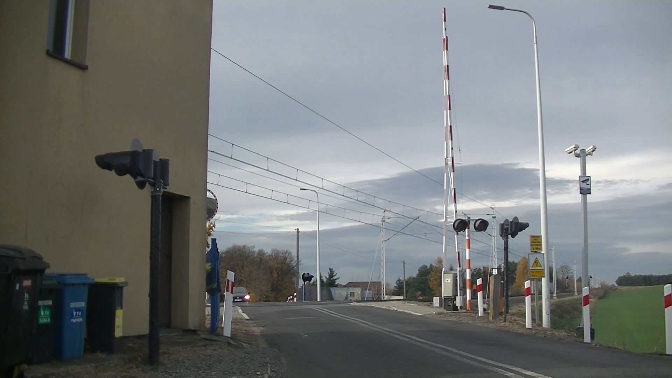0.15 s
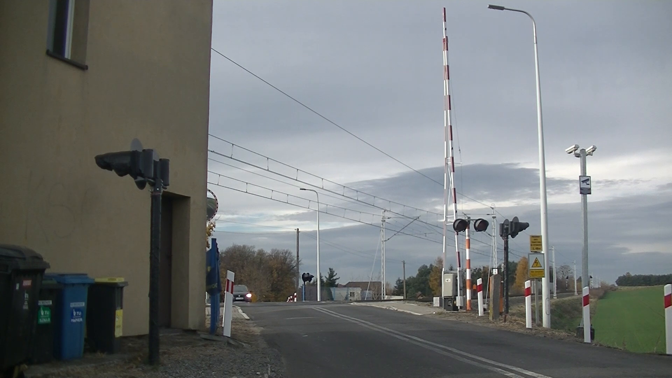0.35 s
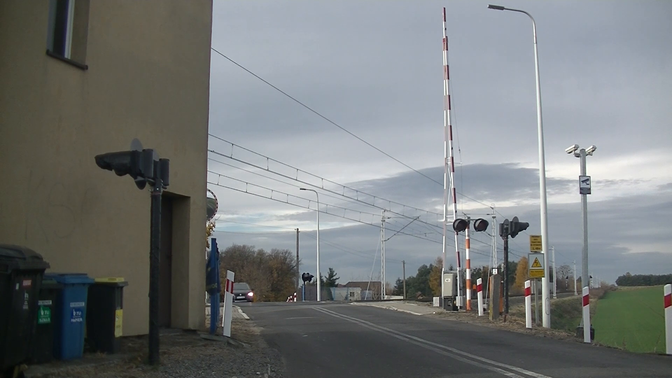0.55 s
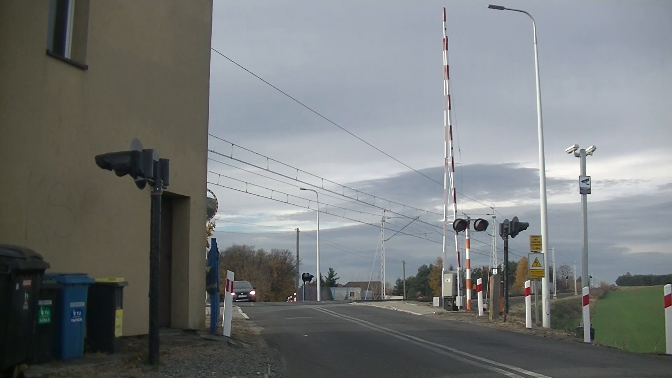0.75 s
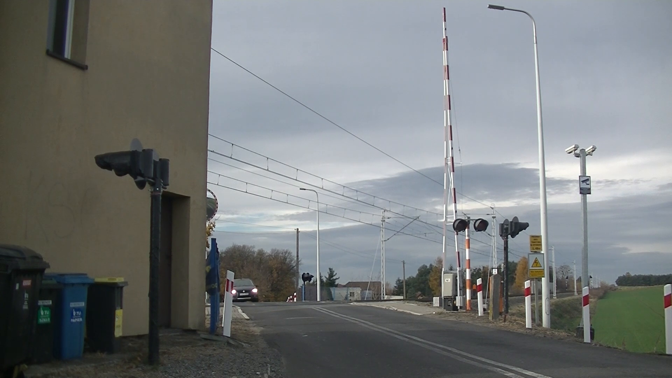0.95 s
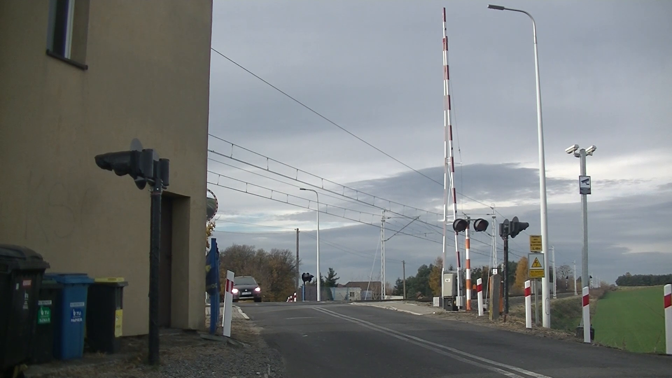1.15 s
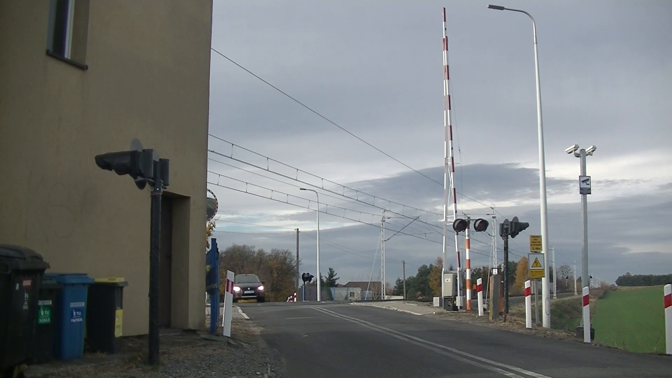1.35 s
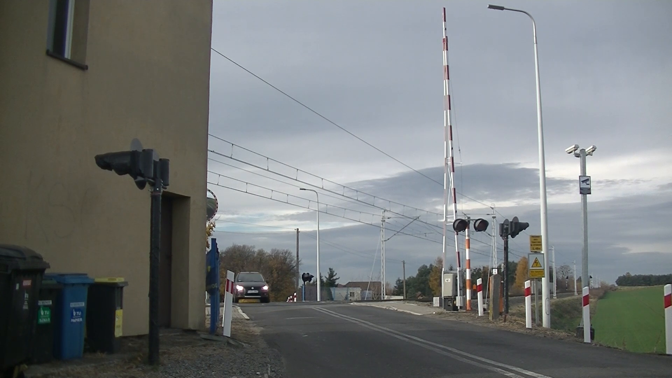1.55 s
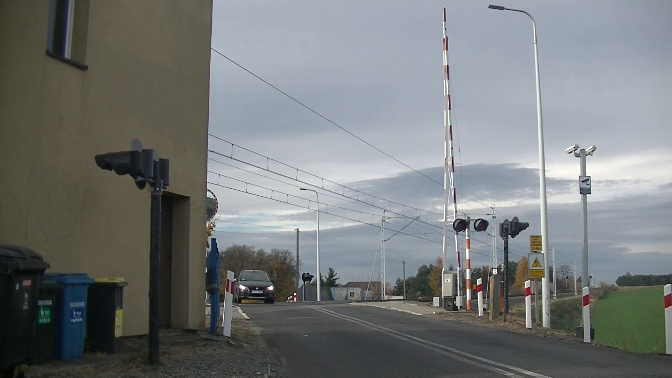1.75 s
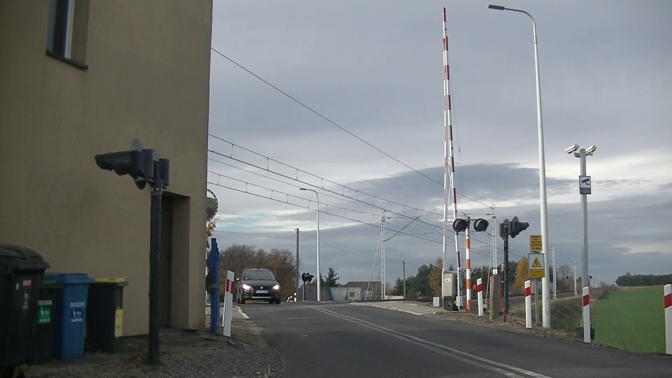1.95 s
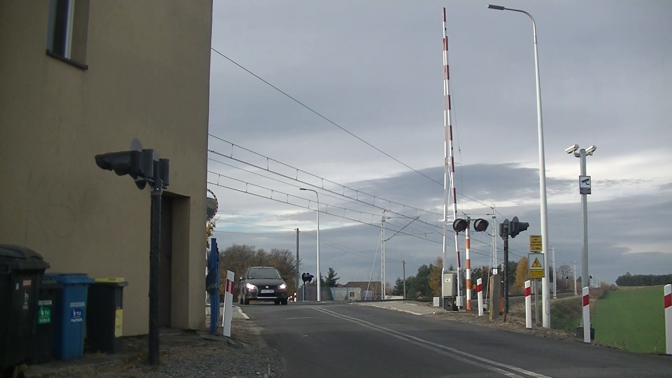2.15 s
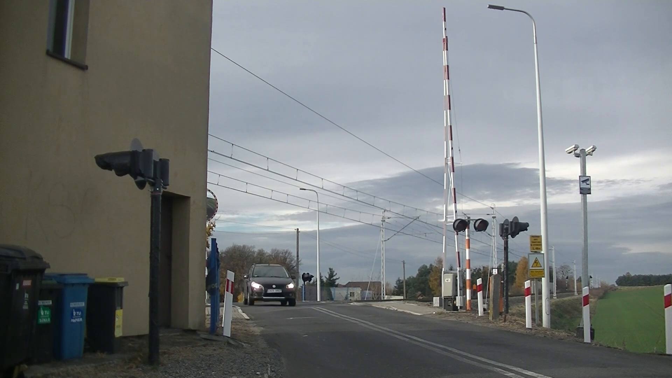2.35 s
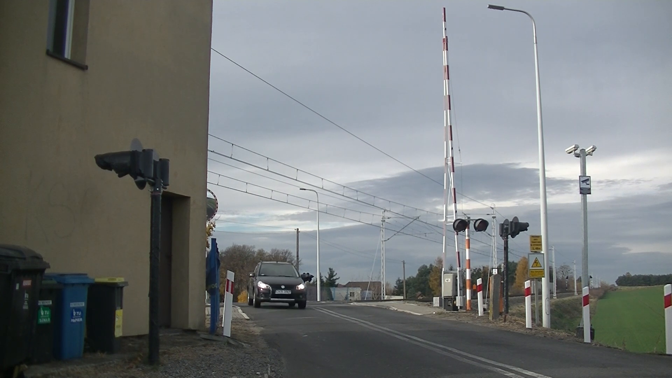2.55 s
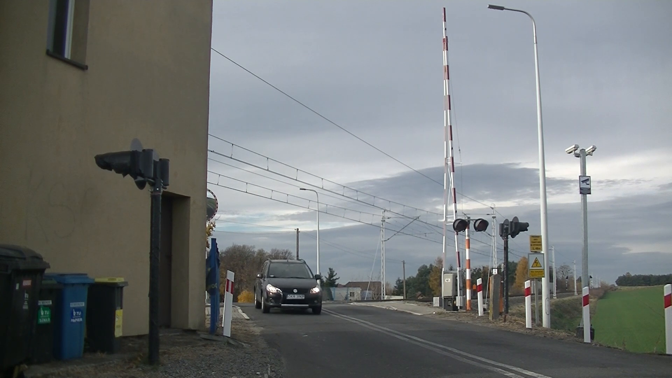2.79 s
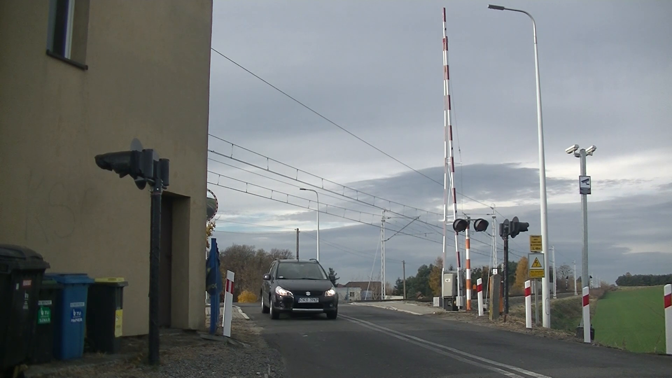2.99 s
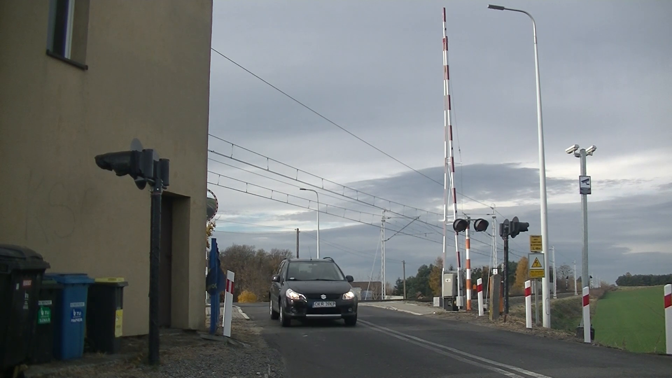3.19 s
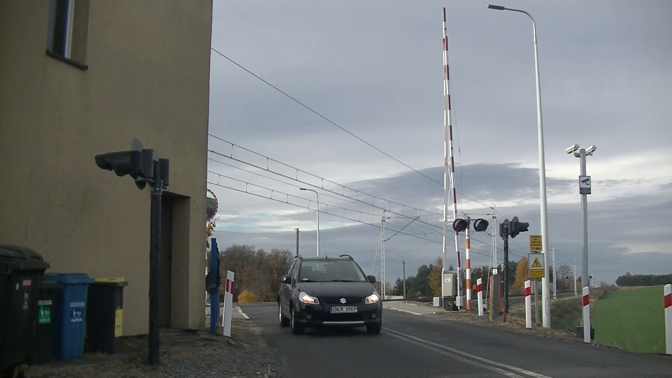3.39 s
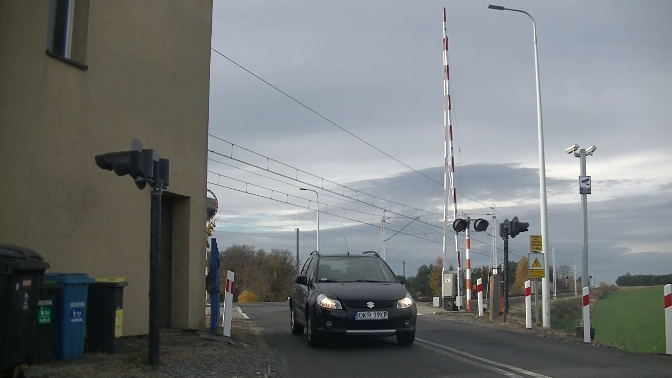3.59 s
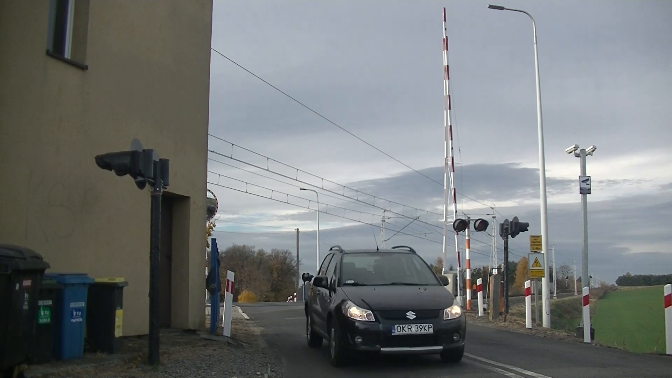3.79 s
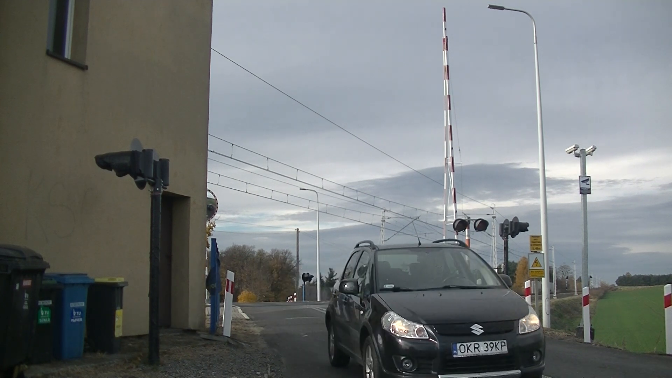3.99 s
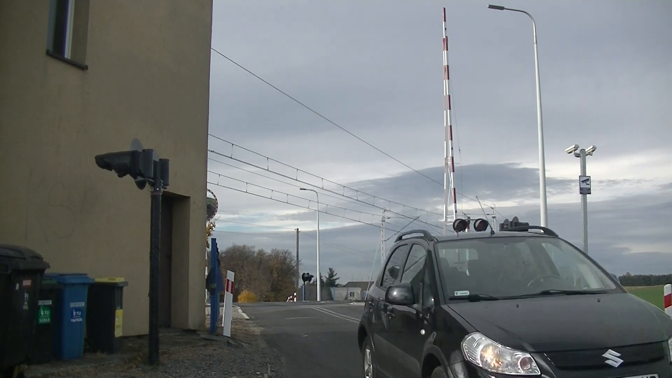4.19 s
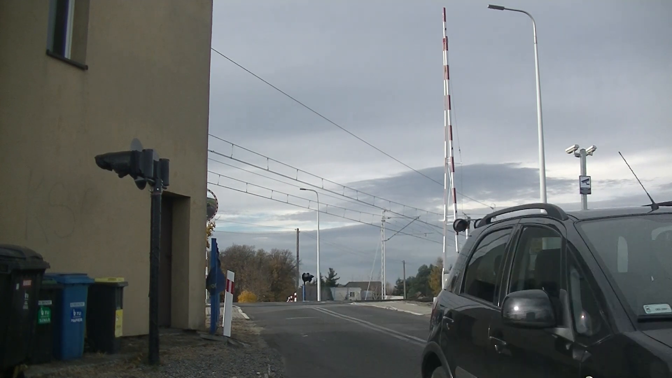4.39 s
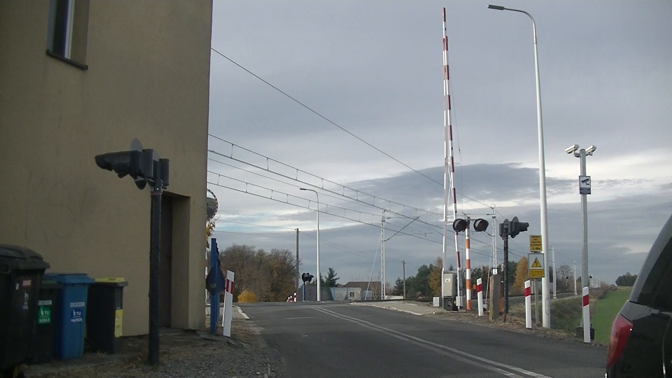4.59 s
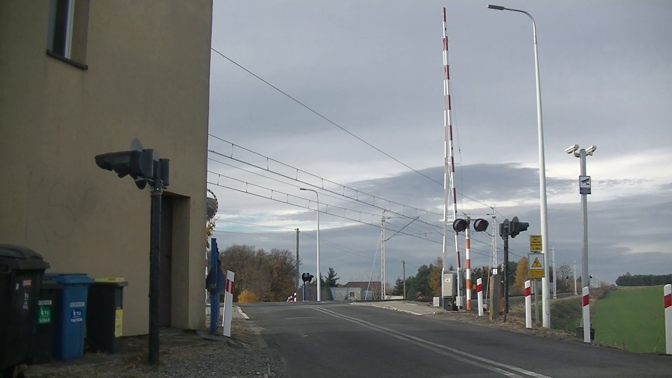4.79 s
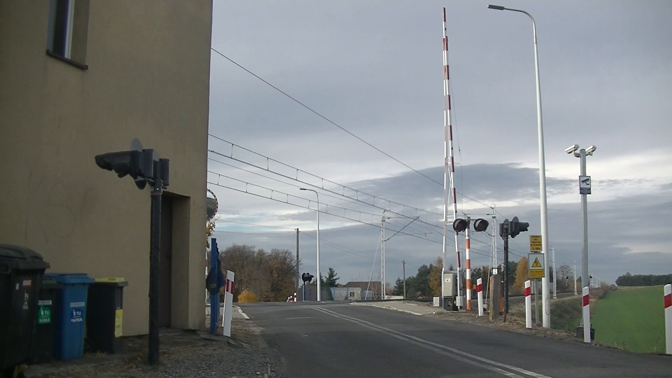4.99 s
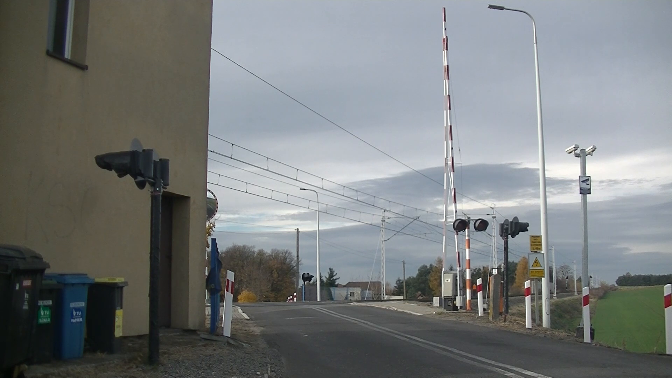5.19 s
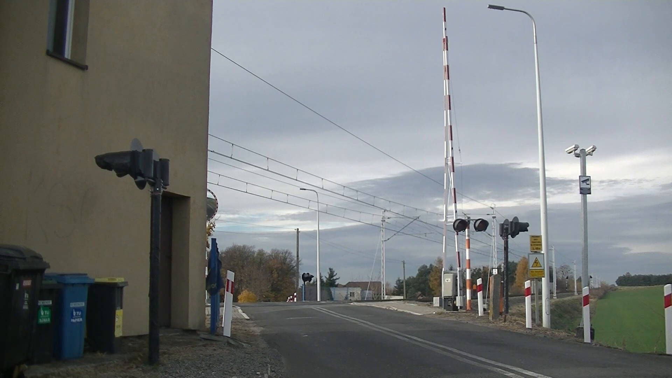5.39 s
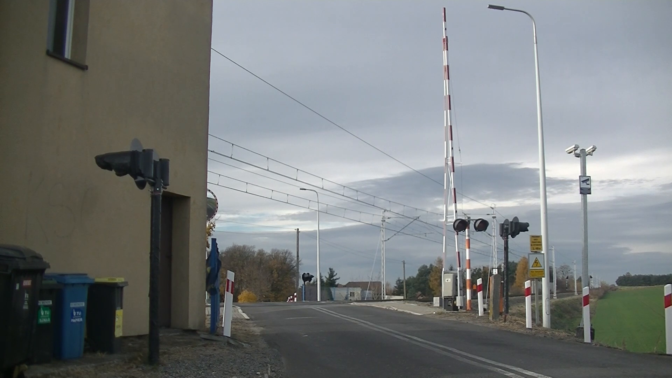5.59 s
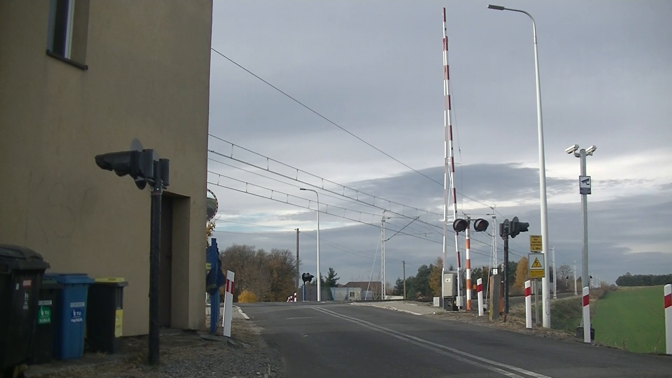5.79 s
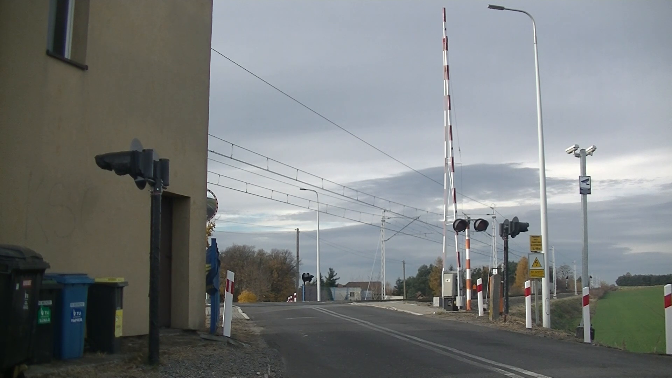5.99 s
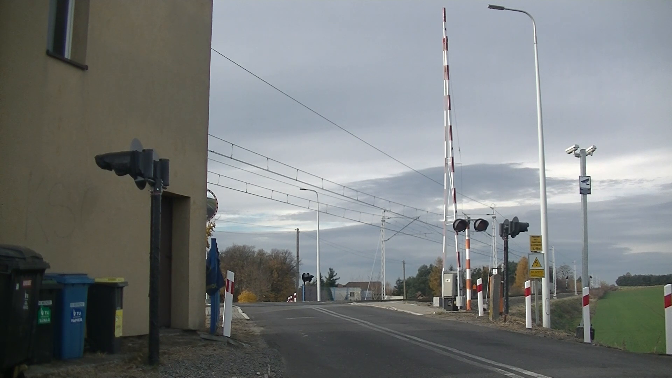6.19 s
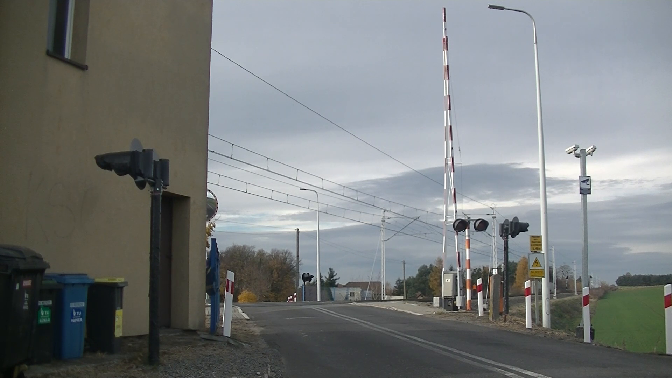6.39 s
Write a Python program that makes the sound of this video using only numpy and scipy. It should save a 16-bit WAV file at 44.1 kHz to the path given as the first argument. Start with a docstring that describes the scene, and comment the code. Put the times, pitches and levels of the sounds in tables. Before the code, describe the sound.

A small car approaches over asphalt, its tyre roar swelling to a close pass, then fading, with wind buffeting and light knocks near the microphone.

```python
"""First heard: open country humming, a breeze buffeting the microphone, a small car faint ahead.
Light knocks come near the microphone. The car clears a house corner and passes 3.4 m from the roadside camera.
Its tyres are filtered noise, coloured by bearing and distance; the quiet engine is a few firing harmonics.
Gusts, drumming over uneven road and ticks of grit are noise bursts; the knocks are decaying sines."""
import sys
import numpy as np
from scipy import signal
from scipy.fft import rfft, irfft
from scipy.io import wavfile
from scipy.ndimage import uniform_filter1d

SR = 44100
rng = np.random.default_rng(int(sys.argv[2]) if len(sys.argv) > 2 else 0)


def persist_wave(psi):
    """Save psi, clipped to +-1, as 16-bit WAV."""
    counts = np.round(np.clip(psi, -1, 1) * 32767).astype(np.int16)
    wavfile.write(sys.argv[1], SR, np.atleast_2d(counts).T)


N = 284004
T = np.arange(N) / SR  # s

# Tyre roar spectrum by the side of the car facing the microphone: [f/Hz, relative level/dB]
ROAR_FAR = [(60, -23), (200, -26), (450, -3), (700, -2), (1050, 1.5), (1450, 1), (2100, -2.5), (3000, -6),
            (4000, -10), (6000, -25.5), (9000, -36.5), (15000, -44)]
ROAR_FRONT = [(60, -26), (200, -14), (450, -12.5), (700, -9.0), (1050, -2.5), (1450, -0.5), (2100, -0.5),
              (3000, -6), (4000, -4), (6000, -23.5), (9000, -38), (15000, -56)]
ROAR_FRONT_WING = [(60, -35), (200, -25.5), (450, -18.5), (700, -9.5), (1050, -1), (1450, -3), (2100, -2),
                   (3000, -3.5), (4000, -3.5), (6000, -24), (9000, -32), (15000, -47)]
ROAR_REAR_WING = [(60, -40), (200, -22), (450, -8), (700, -3.5), (1050, 1.5), (1450, -3), (2100, -1),
                  (3000, -5), (4000, -5), (6000, -21), (9000, -35), (15000, -41)]
ROAR_REAR = [(60, -27), (200, -16.5), (450, -7.5), (700, -5.5), (1050, -1.5), (1420, 3.5), (1700, -6),
             (2150, -2), (3000, -8), (4000, -15.5), (5200, -12.5), (6500, -25.5), (9000, -41), (15000, -58)]
ROAR_LEAVING = [(60, -34), (200, -12.5), (450, -6), (700, -3), (1050, 1.5), (1450, 0.5), (1750, -5),
                (2400, -6.5), (3200, -5.5), (3650, -12.5), (6000, -27.5), (9000, -43.5), (15000, -61)]
# Bearings at which those six are heard, in that order: [angle/degrees], 0 ahead, 180 behind
VIEW_BEARINGS = [6.5, 12, 40, 128, 153, 164]
# Ripple that the ground and the camera's housing put on the roar: [f/Hz, change/dB]
HOUSING_RIPPLE = [(720, 0), (930, 3), (1270, -3.5), (1700, 2.5), (2700, -0.75), (4450, -0.1), (4980, -4.5),
                  (6200, 1.5), (7400, 4), (8300, -.5), (10100, 3), (10900, -5), (12700, 3), (15000, 0.5)]
# The two microphone ports for sound from ahead:
# [f/Hz, left minus right level/dB, left lead/rad, diffuse share/dB]
PORTS_AHEAD = [(60, 0, 0, -16), (300, 0, 0, -16), (700, -1.2, 0, -22), (1500, 0, 0, -34), (2200, 0, 0, -31),
               (3000, -3.1, .1, -15), (4500, -2.6, 0, -19), (5200, -5, -.8, -4), (5900, 5.5, -.4, -9),
               (7100, 11.5, 1, -7), (8200, -1, 1.4, -7), (9500, -7.5, .6, -6), (11000, -1.5, .2, -5),
               (15000, -.5, .2, -6)]
# The same columns for sound from behind, which the camera's body scatters
PORTS_BEHIND = [(60, 0, 0, -10), (300, -1, 0, -12), (700, -1, 0, -22), (1100, 0, 0, -28), (1700, 1, 0, -14),
                (2800, 3.5, 0, -8), (4000, 2.5, 0, -5), (5200, -7, .8, -1.5), (7500, 0, .5, -5),
                (9000, -5, 1, -2), (11000, 0, 1, -1), (15000, -.5, 1, 0)]
# Brief swells and dips of the roar: [t/s, half length/s, change/dB]
ROAR_SURGES = [(2.008, 0.21, 1.4), (2.47, 0.023, 2), (3.432, 0.16, -2), (3.922, 0.16, -1), (4.7, 0.18, 1),
               (5.19, 0.066, 2)]
# Spectrum of open country and microphone hiss: [f/Hz, relative level/dB]
AIR_SPECTRUM = [(25, 7), (50, 1.5), (120, 1.5), (400, 6), (1000, -15.5), (2500, 0), (5000, -15),
                (9000, -19.5), (15000, -25.5)]
# Stronger gusts on the microphone, before eddies and panning: [t/s, half length/s, level/dB]
WIND_GUSTS = [(.035, 0.031, -40.5), (.53, 0.095, -43), (.708, 0.015, -38.5), (.775, 0.035, -40.5),
              (.895, 0.046, -44.5), (1.13, .06, -49.5), (2.83, 0.058, -43.5), (3.17, 0.09, -46),
              (3.485, 0.049, -33.5), (3.71, .058, -43), (4.31, .04, -37), (5.752, 0.023, -34.5),
              (5.812, 0.017, -35), (6.02, 0.05, -44.5)]
# Spectrum of the wind's buffeting: [f/Hz, relative level/dB]
BUFFET_SPECTRUM = [(25, -24), (60, -22.5), (130, -4.5), (230, -0.5), (400, -1.5), (600, -7), (1000, -15),
                   (3000, -52)]
# Light knocks near the microphone: [t/s, level/dB, contact time/s]
KNOCK_BLOWS = [(0.8708, -30, .0001), (0.883, -25, .001), (0.9046, -19.5, .0002), (0.9101, -26, .0003),
               (0.9158, -21, .0002), (0.9204, -32, .0002)]
# Modes of the body they ring: [f/Hz, relative level/dB, t60/s]
BODY_MODES = [(354, -11, 0.025), (567, -8.5, .035), (654, -5, 0.036), (800, -2, 0.016), (1120, 1, 0.0097),
              (1320, -8, 0.013), (2050, -8, 0.0083), (3440, -10, 0.01)]
# Tyres drumming over uneven road: [t/s, half length/s, level/dB]
ROAD_BUMPS = [(3.147, 0.006, -27.5), (5.8, 0.014, -30), (5.845, 0.0086, -28), (6.23, 0.019, -34),
              (6.275, 0.018, -30), (6.33, 0.026, -42), (6.41, 0.047, -38)]
# Spectrum of that drumming: [f/Hz, relative level/dB]
DRUM_SPECTRUM = [(100, -26), (400, -9), (750, -1), (1050, -1), (1500, -12), (3000, -32), (8000, -55)]
# Grit thrown by the tread, before crackle: [t/s, half length/s, level/dB]
GRIT_TICKS = [(1.408, .005, -53), (5.14, 0.015, -39), (6.03, .01, -43), (6.075, 0.012, -43),
              (6.132, .013, -47), (6.175, .01, -51)]
# Spectrum of the grit: [f/Hz, relative level/dB]
GRIT_SPECTRUM = [(1000, -18), (3500, 5), (5000, 2), (7800, -4), (10000, -19), (15000, -27)]

SPEED, MISS_M, PASS_S = 10.35, 3.39, 4.473  # m/s, nearest distance, moment of passing
# house corner: loss while it screens the car, moment the car comes clear, time scale of clearing
SCREEN_DB, CLEAR_S, CLEARING_S = 10.5, 2.476, 0.22
# roar: base level at 1 m, extra towards the front, extra along the road (tread and asphalt form a horn)
TYRE_DB, FORWARD_DB, HORN_DB = -6.5, 2, 1.6
# engine: firing rate before Doppler, base level at 1 m, extra towards the exhaust
FIRING_HZ, ENGINE_DB, EXHAUST_DB = 55.8, -47, 8
AIR_DB, BREEZE_DB = -53.5, -61.5  # base levels of country air and of the breeze under the gusts
TOP_HZ = 15600  # upper limit of the camera's sound


def undb(db):
    """Decibels to gain."""
    return 10 ** (np.asarray(db) / 20)


def curve(table, hz):
    """The columns of a table, interpolated at the given frequencies."""
    f, *columns = np.transpose(table)
    return [np.interp(hz, f, column) for column in columns]


def shape(points, hz):
    """A spectrum's dB at the given frequencies, interpolated on a log scale."""
    f, db = np.transpose(points)
    return np.interp(np.log(hz + 1), np.log(f), db)


def colour(x, points):
    """Filter by a spectrum and scale to rms 1."""
    hz = np.arange(N // 2 + 1) * SR / N
    y = irfft(rfft(x) * undb(shape(points, hz)), N)
    return y / y.std()


def walk(rate):
    """Smoothed random steps, `rate` per second, with a spread near 1."""
    step = int(SR / rate)
    held = np.repeat(rng.standard_normal(N // step + 1), step)
    smooth = uniform_filter1d(uniform_filter1d(held, step), step)
    return 1.3 * smooth[:N]


def pan(db):
    """Left and right gains for a left minus right level."""
    return undb(np.array([[.5], [-.5]]) * db)


def stereo_noise(points, side_db):
    """Coloured noise with a share that differs between left and right."""
    mid, side = colour(rng.standard_normal((2, N)), points)
    side = side * undb(side_db)
    return np.array([mid + side, mid - side]) / np.hypot(1, undb(side_db))


def swells(table):
    """Envelope of bell-shaped bursts, summed in power."""
    power = sum(undb(db) ** 2 * np.exp(-((T - s) / half) ** 2) for s, half, db in table)
    return np.sqrt(power)


def country(alike_hz=3000):
    """Far traffic and open air, more alike on both sides in the bass than in the hiss."""
    mid, side = colour(rng.standard_normal((2, N)), AIR_SPECTRUM)
    highpass = signal.butter(1, alike_hz, "high", fs=SR, output="sos")
    side = 0.23 * side + 0.73 * signal.sosfilt(highpass, side)
    return np.array([mid + side, mid - side]) * undb(AIR_DB + 0.16 * walk(2.7))


def wind(eddy_db=2):
    """A light breeze and its gusts break into eddies on the microphone, mostly on its left side."""
    flow = np.hypot(swells(WIND_GUSTS), undb(BREEZE_DB))
    eddies = undb(eddy_db * walk(120))
    return stereo_noise(BUFFET_SPECTRUM, side_db=-10.5) * flow * eddies * pan(6.2)


def path(t):
    """Car at steady speed: cosine of its bearing (1 ahead, -1 behind), dB lost to distance and the house."""
    ahead_m = SPEED * (PASS_S - t)
    distance_m = np.hypot(ahead_m, MISS_M)
    hidden = .5 - .5 * np.tanh((t - CLEAR_S) / CLEARING_S)
    return ahead_m / distance_m, 20 * np.log10(distance_m) + SCREEN_DB * hidden


def roar_level():
    """Tyre level in dB: it follows distance, screening and bearing, with a few brief swells and dips."""
    facing, loss_db = path(T)
    surge_db = sum(db * np.exp(-((T - s) / half) ** 2) for s, half, db in ROAR_SURGES)
    return TYRE_DB + FORWARD_DB * facing + HORN_DB * facing ** 2 - loss_db + surge_db


def ports(table, hz):
    """Left and right gains for the direct sound, and the gain of the diffuse sound."""
    balance_db, lead, diffuse_db = curve(table, hz)
    direct = pan(balance_db) * np.exp(np.array([[.5j], [-.5j]]) * lead)
    direct = direct / abs(direct.mean(axis=0))
    return np.vstack([direct, undb(diffuse_db)])[:, :, None]


def roar_colour(hz, t):
    """The roar's spectrum turns with the car's bearing; its main band keeps an even power."""
    bearing = np.degrees(np.arctan2(MISS_M, SPEED * (PASS_S - t)))
    sides = (ROAR_FAR, ROAR_FRONT, ROAR_FRONT_WING, ROAR_REAR_WING, ROAR_REAR, ROAR_LEAVING)
    ripple_db = shape(HOUSING_RIPPLE, hz)
    views = np.array([shape(side, hz) + ripple_db for side in sides])
    gain = undb([np.interp(bearing, VIEW_BEARINGS, view) for view in views.T])
    roar_band = (hz > 750) & (hz < 4500)
    return gain / np.sqrt((gain[roar_band] ** 2).sum(axis=0) / len(hz))


def tyres(grain_db=0.9, flutter_db=0.59, low_flutter_db=1.3, turn_s=0.18, turn_lag_s=0.21):
    """Countless tread impacts sum to noise, coloured by bearing; the road's texture makes them flutter."""
    impacts = rng.standard_normal((2, N)) * undb(grain_db * walk(900))
    hz, t, z = signal.stft(impacts, SR, nperseg=1024)
    gain = roar_colour(hz, t)
    # long undulations of the road shake the carcass, which sounds below the tread
    carcass = 1 / (1 + (hz / 1200) ** 2)
    gain *= undb(low_flutter_db * np.outer(carcass, np.interp(t, T, walk(40))))
    # once the rear wheels are past, the sound reaches the ports from behind
    past = .5 + .5 * np.tanh((t - PASS_S - turn_lag_s) / turn_s)
    left, right, diffuse = (1 - past) * ports(PORTS_AHEAD, hz) + past * ports(PORTS_BEHIND, hz)
    ears = np.array([left * z[0] + diffuse * z[1], right * z[0] - diffuse * z[1]])
    roar = signal.istft(ears * gain, SR)[1][:, :N] / impacts.std()
    return roar * undb(roar_level() + flutter_db * walk(30))


def engine(wobble=0.0038, rough_db=2.0):
    """A smooth four-cylinder at low load: wavering firing harmonics that drop in pitch as it passes."""
    facing, loss_db = path(T)
    hz = FIRING_HZ / (1 - facing * SPEED / 343)  # Doppler; sound travels at 343 m/s
    phase = 2 * np.pi * np.cumsum(hz * (1 + wobble * walk(14))) / SR
    firing = np.zeros(N)
    for k, db in enumerate([-18, -5, -3.5, -6], 1):
        firing += undb(db + rough_db * walk(15.0)) * np.sin(k * phase)
    return undb(ENGINE_DB - EXHAUST_DB * facing - loss_db) * firing


def knocks(rise_s=0.00032):
    """A quick rattle of light blows on one damped body; a longer contact is duller."""
    out, t = np.zeros(N), T[:SR // 10]
    for s, level_db, contact in KNOCK_BLOWS:
        ring = np.zeros(len(t))
        for hz, db, t60 in BODY_MODES:
            decay = undb(db - 60 * t / t60)
            ring += decay * np.sin(2 * np.pi * hz * t) / np.hypot(1, 2 * hz * contact)
        start = int(s * SR)
        out[start:start + len(t)] -= undb(level_db) * ring * (1 - np.exp(-t / rise_s))
    return out * pan(1.5)


def road(crackle_db=3):
    """Rough patches drum in the tyres and loose grit crackles, both as bursts of coloured noise."""
    drum = stereo_noise(DRUM_SPECTRUM, side_db=-26) * swells(ROAD_BUMPS)
    grit = stereo_noise(GRIT_SPECTRUM, side_db=-10) * swells(GRIT_TICKS)
    return drum + grit * undb(crackle_db * walk(700))


def scene():
    """Country air, wind, the passing car, the knocks and the road under the tyres."""
    return country() + wind() + tyres() + engine() + knocks() + road()


def record(dry, low_hz=33):
    """The camera cuts the deep bass and the very top."""
    highpass = signal.butter(4, low_hz, "high", fs=SR, output="sos")
    lowpass = signal.ellip(12, .1, 80, TOP_HZ, fs=SR, output="sos")
    return signal.sosfilt(lowpass, signal.sosfilt(highpass, dry))


dry = scene()
out = record(dry)
persist_wave(out)
```